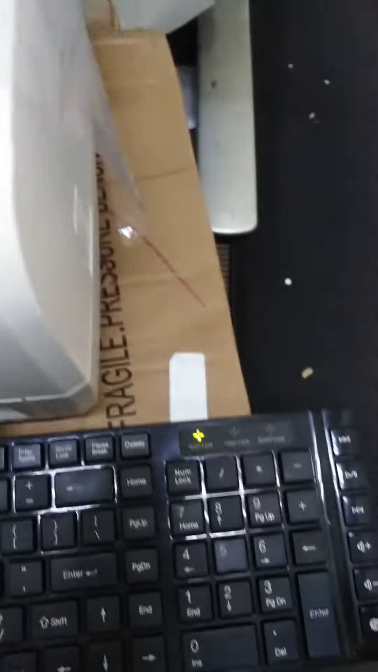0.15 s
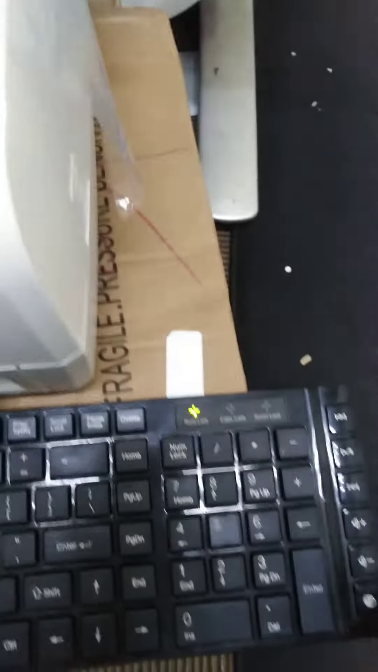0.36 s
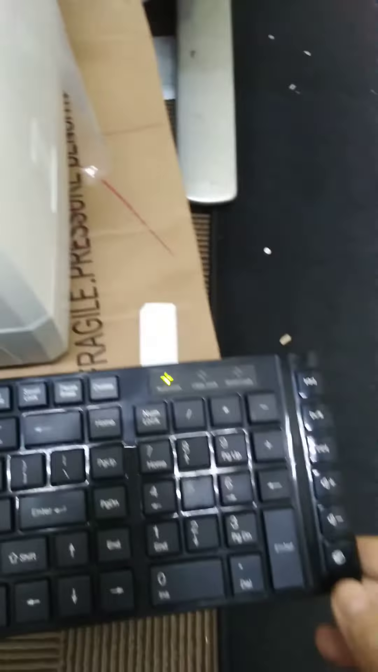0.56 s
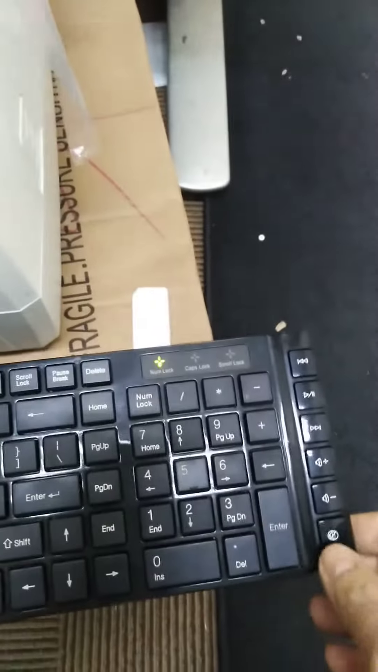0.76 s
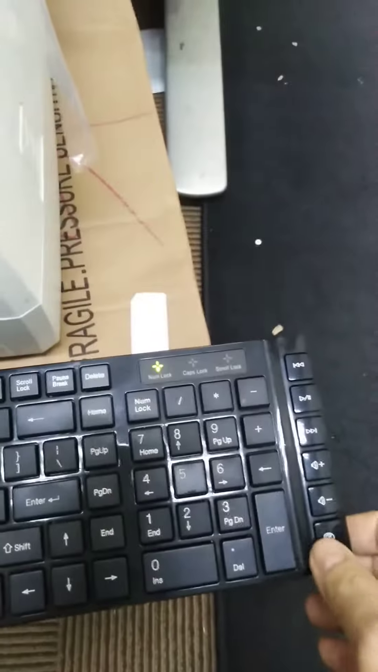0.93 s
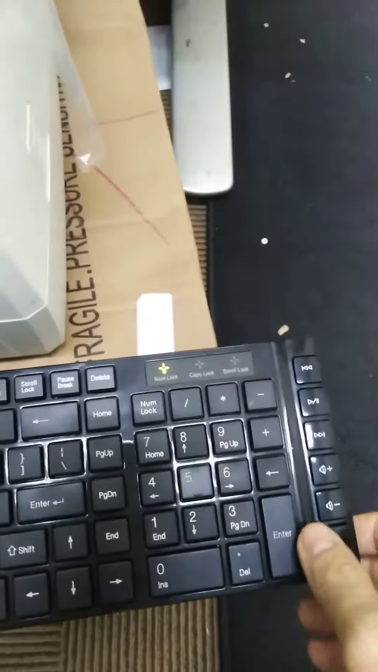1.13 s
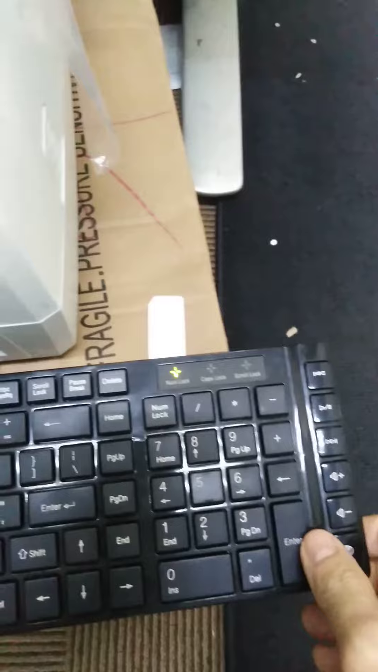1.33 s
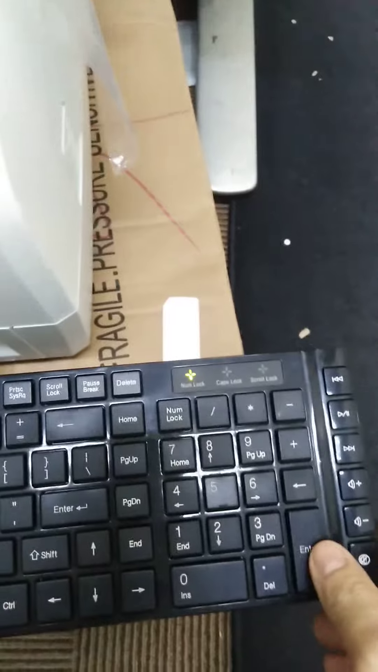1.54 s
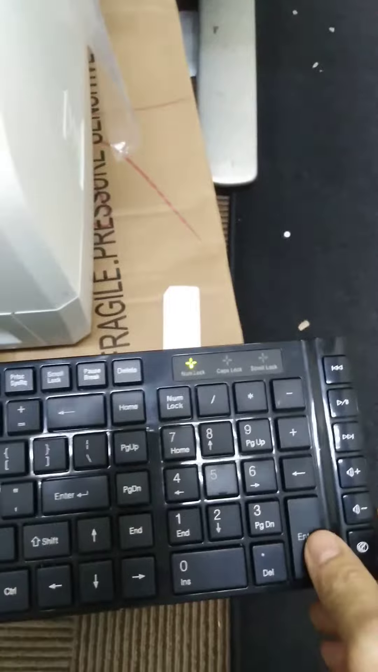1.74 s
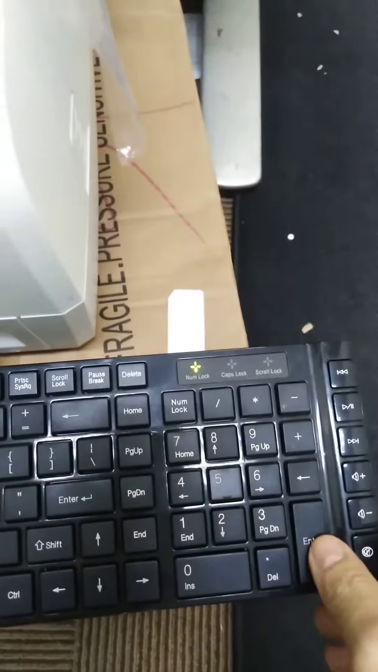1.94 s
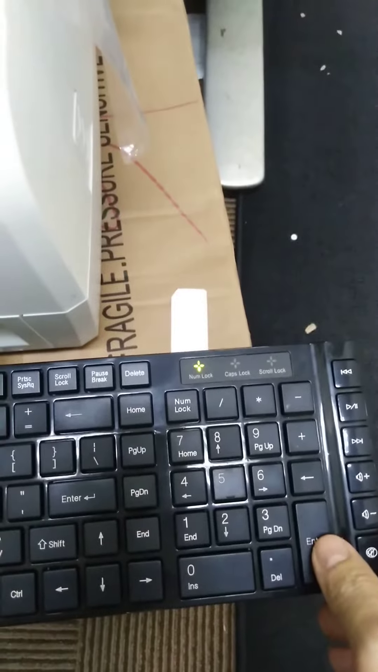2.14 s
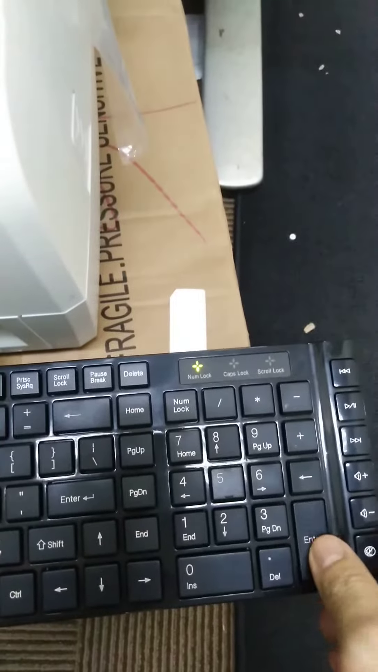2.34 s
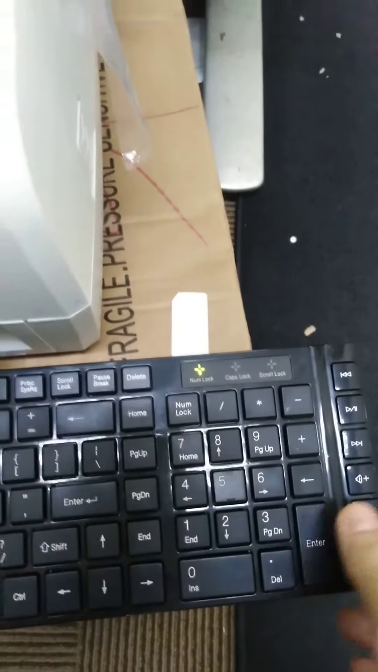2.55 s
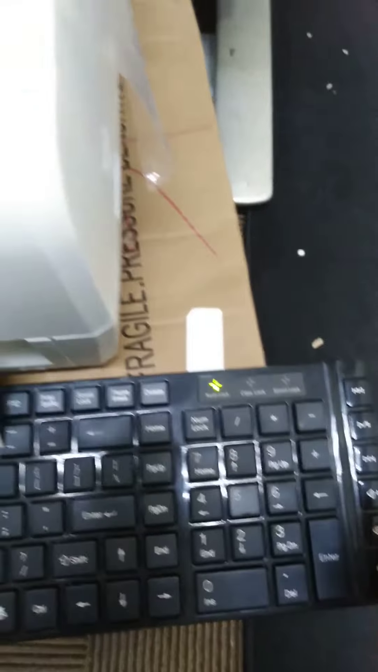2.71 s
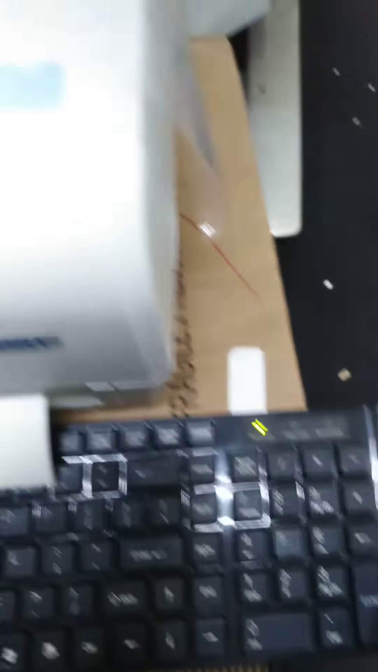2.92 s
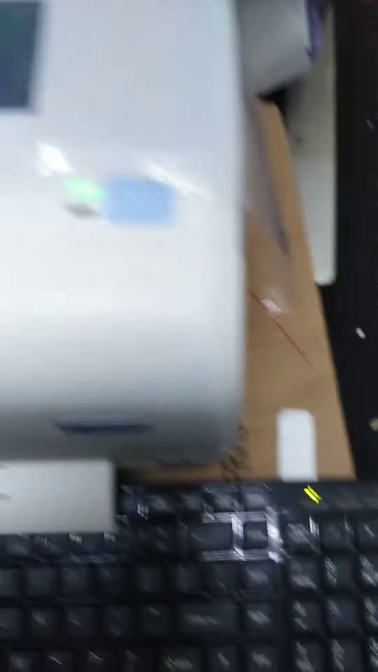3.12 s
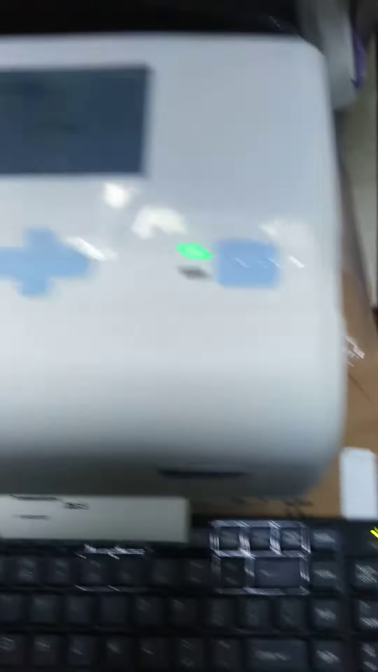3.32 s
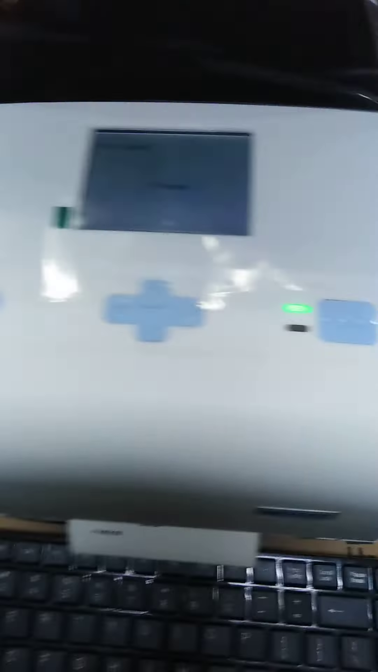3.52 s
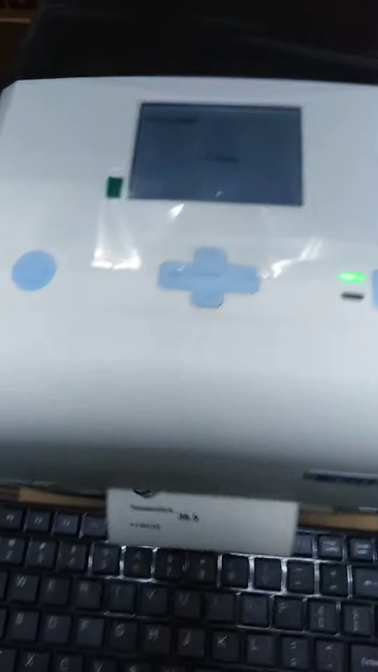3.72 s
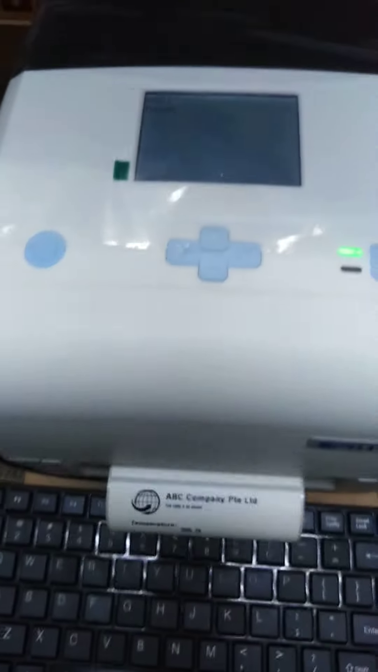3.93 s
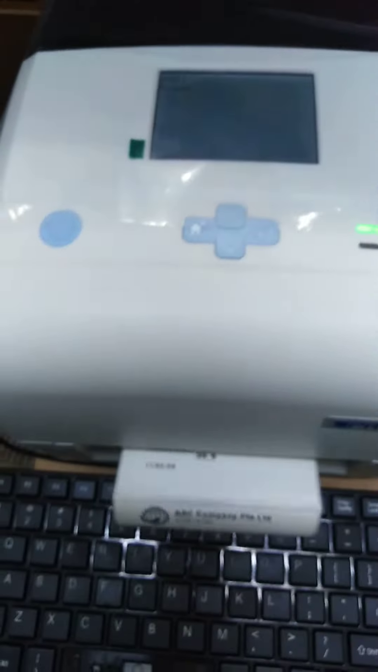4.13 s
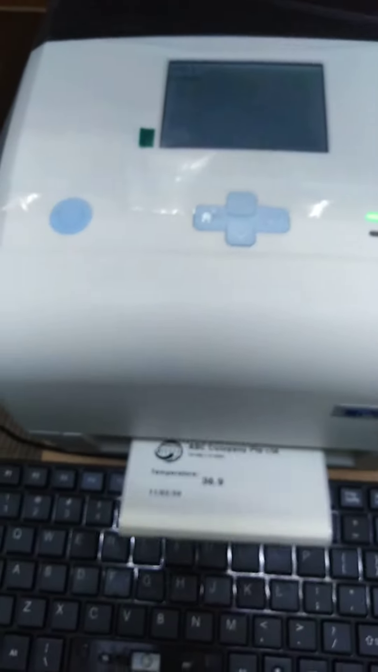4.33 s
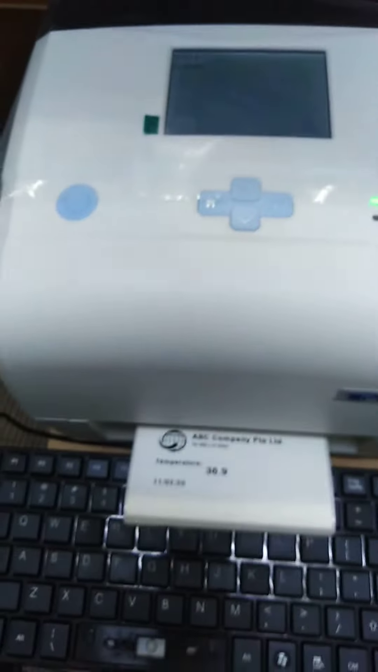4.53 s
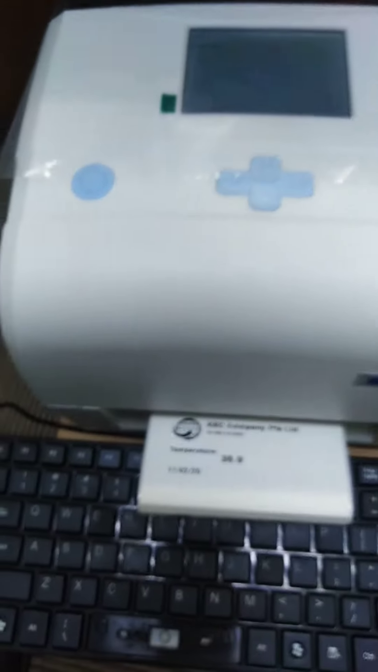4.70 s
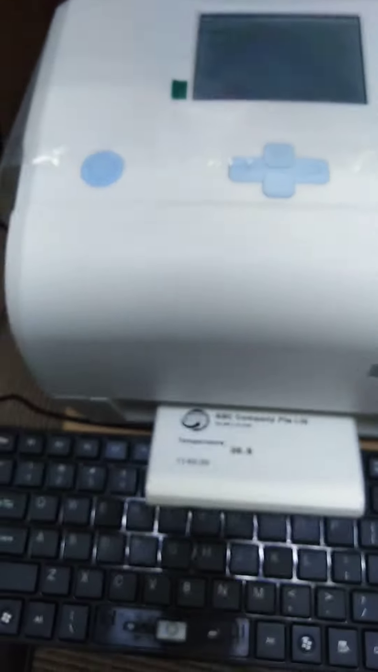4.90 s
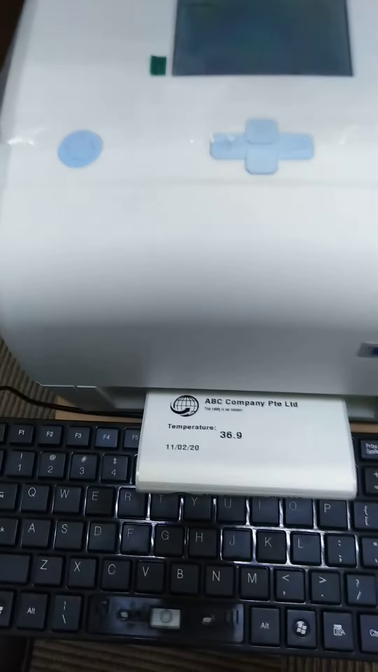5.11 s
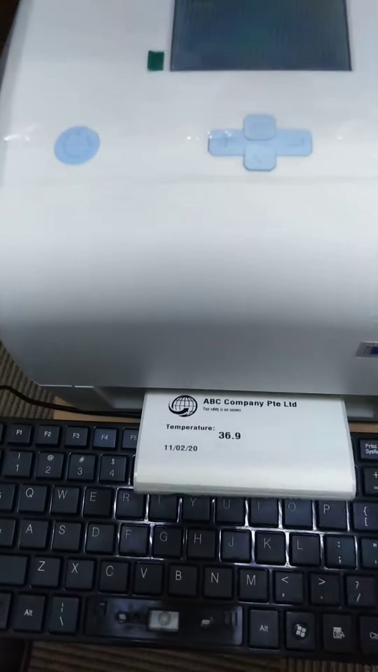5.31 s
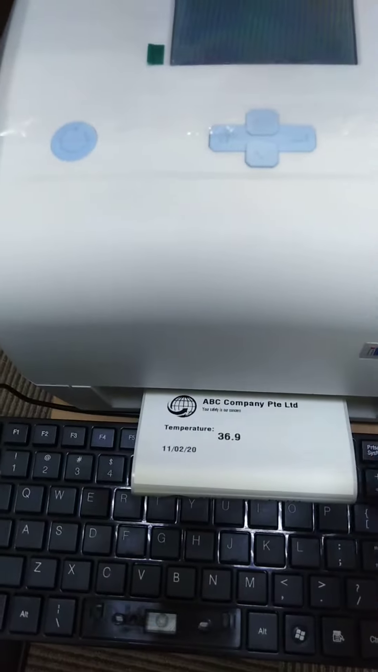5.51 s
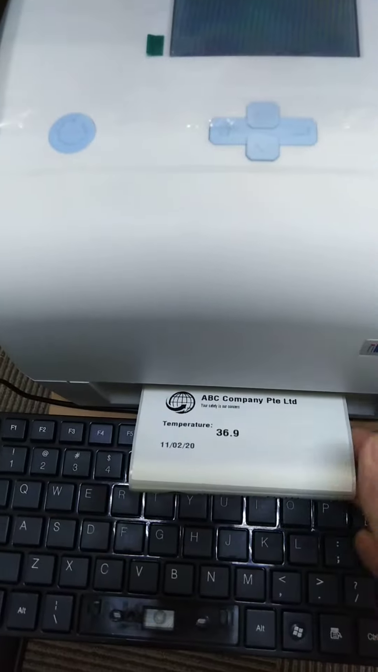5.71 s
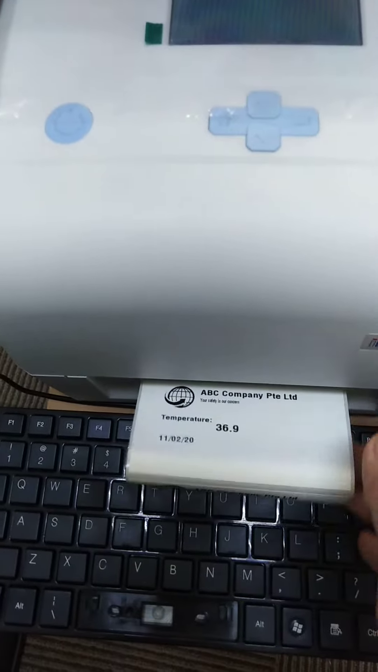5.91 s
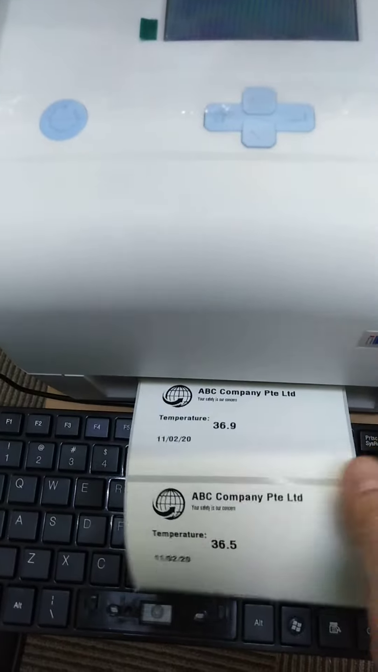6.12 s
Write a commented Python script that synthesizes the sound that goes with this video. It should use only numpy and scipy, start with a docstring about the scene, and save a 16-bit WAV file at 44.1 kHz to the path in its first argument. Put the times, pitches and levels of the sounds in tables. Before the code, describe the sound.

Over a low room hum, light key clicks start a label printer whirring twice, and a label is snapped off up close.

```python
"""Label printer on a desk

A small room, ventilation humming throughout, a stereo microphone by the printer. A key is pressed;
the stepper motor pulls the label back, feeds it out under the print head, brakes and nudges it to
the tear edge, whining through the case while gears rattle and paper hisses. A sleeve swishes, a hand
takes the label and it comes off with a sharp snap, close to the microphone."""
import sys
import numpy as np
from scipy import signal
from scipy.fft import rfft, irfft, next_fast_len
from scipy.io import wavfile
from scipy.ndimage import map_coordinates

SR = 44100
rng = np.random.default_rng(int(sys.argv[2]) if len(sys.argv) > 2 else 0)


def put_to_file(sound):
    """Save the sound as 16-bit audio at rate SR, in the file named by the first command-line argument."""
    columns = np.atleast_2d(sound).T  # one column per channel
    safe = np.clip(columns, -1, 1)
    whole_steps = np.round(safe * 32767)
    wavfile.write(sys.argv[1], SR, whole_steps.astype(np.int16))


N = 271567
TIME = np.arange(N) / SR

# spectra of the air, hands, printer, label and microphone: (frequency [Hz], level [dB])
VENT_COLOUR = [(15, -54), (30, -47), (40, -28.5), (52, -5.5), (86, 0), (119, -8), (148, -5),
               (205, -12.5), (248, -12), (320, -14.5), (600, -18), (760, -27), (1000, -46), (3000, -64)]
RUSH_COLOUR = [(450, -29), (700, -2), (880, -1), (1020, -8.5), (1200, -29.5), (2000, -40.5)]
SLEEVE_COLOUR = [(400, -15), (900, 2.5), (1150, -12), (1700, -11.5), (2900, -1.5), (4200, 0.5), (6200, -1),
                 (8500, -3.5), (14000, -5), (16000, -25)]
BRUSH_COLOUR = [(700, -6), (1250, 3.5), (1600, -5), (2300, 0.5), (3400, -4.5), (6300, 6.5), (9000, 0),
                (12500, -5), (16000, -9.5)]
KEY_COLOUR = [(300, -50), (800, -18), (2200, -17.5), (3800, 0), (6000, -0.5), (8000, 2.5), (11000, -4.5),
              (14000, -13), (16000, -15)]
CHATTER_COLOUR = [(300, -32), (1000, 1), (2000, -4.5), (3000, -1), (4200, -2.5), (5500, -5.5), (7500, -7.5),
                  (10000, -18), (15000, -32)]
GEAR_COLOUR = [(120, -3.5), (220, 13.5), (330, 3.5), (480, 6), (700, -3), (900, 4), (1300, -1.5), (1850, 2),
               (2400, -6), (3000, -0.5), (3700, -14), (5000, -12), (8000, -46)]
PAPER_COLOUR = [(1500, -15.5), (3500, -0.5), (4800, 1.5), (6200, 0.5), (7050, -1), (8000, -9.5),
                (9500, -3.5), (10500, -10.5), (14000, -9.5), (16000, -45)]
TICK_COLOUR = [(300, -40), (800, -5), (3000, -11), (5000, 4), (6500, -1.5), (9000, -8), (12000, -7.5),
               (16000, -15.5)]
DRONE_COLOUR = [(600, -45), (800, -3), (930, 5), (1100, -18), (1400, -24), (3000, -56)]
CASE_RESPONSE = [(150, -23), (200, -4), (236, 6), (275, 4), (340, -7), (520, 6), (700, -1), (880, 1.5),
                 (1050, -1.5), (1300, -1.5), (1600, 0.5), (2000, -1), (2550, -2.5), (2850, 5.5), (3300, 2),
                 (3700, -1), (4300, 1.5), (5200, -4), (6300, -12), (9000, -24)]
PULL_COLOUR = [(200, -41), (600, 0), (1100, 5.5), (1800, 13.5), (2600, 7), (4000, 4.5), (6000, 4),
               (8500, -0.5), (13000, -9), (16000, -14)]
SNAP_COLOUR = [(300, -17), (700, -17.5), (1200, -0.5), (2400, -2), (3800, -5.5), (5000, -3.5), (6100, -1.5),
               (7300, -14.5), (10400, -8.5), (14000, -12), (16000, -5)]
MIC_HISS = [(600, -7), (2300, 12), (3500, 3.5), (6500, -6), (10000, -5.5), (14000, -14), (16000, -30)]
# fan tones: (frequency [Hz], level [dB])
FAN_TONES = [(93, -60), (145, -63), (303, -66.5)]
# course of the lowest fan tone and of the soft rush near the printer: (time [s], gain [dB])
FAN_CURVE = [(0, 11), (2.3, 7), (3.2, 9), (4.5, -23), (6.16, -15)]
RUSH_CURVE = [(0, -88), (2.9, -75), (4.7, -60.5), (5.3, -66.5), (6.16, -59.5)]
# decay of the room: (frequency [Hz], t60 [s])
ROOM_DECAY = [(200, 0.29), (1000, 0.45), (3000, 0.42), (7000, 0.36), (14000, 0.46)]
# likeness of left and right at the microphone: (frequency [Hz], correlation [ratio])
COHERENCE = [(60, 0.95), (200, 0.94), (500, 0.72), (1200, 0.26), (2500, 0.71), (5000, 0.36), (14000, 0.12)]
# lean of the microphone ports and the off-centre label: (frequency [Hz], left over right [dB])
PORT_BALANCE = [(60, 0.6), (200, 1), (380, -2.5), (700, 1.5), (1300, -1.5), (2400, -1.5), (4400, 1.5),
                (6500, 6), (8500, 3.5), (10500, -11), (15000, -7)]
LABEL_BALANCE = [(1000, 1), (2000, 7), (4000, -2.5), (6500, 1), (9000, -3), (14000, -1)]
# whines at rest: (start [s], end [s], frequency [Hz], level [dB])
IDLE_TONES = [(4.62, 5.03, 2390, -85), (4.795, 5.021, 6540, -89)]
# creaks under the hand: (start [s], length [s], frequency [Hz], level [dB])
CREAKS = [(0.303, .06, 1250, -76), (0.418, 0.09, 2200, -76.5), (.66, .06, 1140, -73),
          (0.867, 0.027, 2500, -79), (1.039, .03, 1090, -71), (1.177, .04, 1330, -76),
          (1.885, 0.13, 1290, -73)]
# brushes of fingers and cuff: (start [s], end [s], level [dB])
BRUSHES = [(0, .08, -70.5), (0.082, 1.153, -83.5), (0.594, 0.713, -80.5), (0.99, 1.11, -80.5),
           (1.83, 2.1, -88), (2.7, 2.74, -78.5), (2.861, 3.0, -70.5), (4.796, 5.03, -78),
           (5.354, 5.57, -66), (5.57, 5.68, -78.5)]
# modes that the knocks ring: (frequency [Hz], level [dB], t60 [s])
KEY_MODES = [(1430, -2.5, 0.11), (1860, 0, 0.14), (2440, -11, 0.042), (2880, -0.5, 0.096),
             (3900, -3.5, 0.1)]
CASE_MODES = [(1795, 2, 0.022), (1560, -3, 0.012), (1020, -14, 0.019), (2960, -19, 0.021)]
LABEL_MODES = [(1420, 0, 0.0078), (1766, 9.5, 0.013), (2620, 7, 0.0055), (5830, -2.5, 0.0065)]
# finger on keys: (time [s], crack [dB], knock [dB], brightness [dB/octave], ring pitch [ratio])
KEY_HITS = [(1.101, -64, -46.5, -1.5, 1.3), (1.299, -74, -47.5, -4.5, 1.0), (1.4615, -50, -46, 10, 2.35),
            (2.1445, -37, -46, 8.5, 2.3), (2.331, -43.5, -48, -10.5, 1.4), (2.427, -58, -49, -12, 2.7),
            (2.442, -62, -57, -13, 2.4), (2.452, -32, -35, -5.5, 2.3), (2.46, -27.5, -49, -6, 2.6),
            (2.4645, -25.5, -46, 3, 1.7), (2.4665, -26, -47, -2.5, 1.9)]
# ticks in the printer: (time [s], crack [dB], knock [dB])
TICKS = [(3.111, -45, -23), (3.375, -27.5, -50), (3.459, -43, -39), (3.769, -28, -23.5),
         (3.822, -40, -30.5), (3.873, -28, -38), (3.882, -28, -39), (3.93, -26, -30.5),
         (3.9472, -17.5, -38), (4.024, -20, -44), (4.046, -29, -43), (4.056, -28, -38), (4.196, -28.5, -52),
         (4.211, -20.5, -36), (4.218, -28, -45), (4.2574, -20, -23.5)]
# label against the tear edge: (time [s], crack [dB], knock [dB], brightness [dB/octave])
SNAPS = [(5.7345, -43, -42, -7), (5.738, -45, -25, 3), (5.8, -44, -60, -2), (5.882, -51, -58, -9),
         (6.0076, 2.5, -15, 0), (6.0092, -5, -12, -4), (6.0185, -18, -41, 2)]
# gear teeth clashing: (start [s], length [s], level [dB], ring [Hz])
CHATTER = [(3, 0.0091, -35, 2950), (3.009, 0.011, -34.5, 3980), (3.055, 0.021, -37.5, 1650),
           (3.101, 0.013, -42, 1740), (3.493, 0.02, -37.5, 4050), (3.517, .012, -46.5, 2890),
           (3.575, 0.008, -39, 5270), (3.601, 0.035, -41.5, 2290), (4.384, 0.014, -46.5, 2880),
           (4.459, 0.014, -52, 2750), (4.571, 0.023, -47.5, 4350)]
# efforts of the roller on dense print and the hand on the label: (start [s], peak [s], level [dB])
STRAINS = [(3.85, 3.88, -41.5), (3.88, 3.95, -52), (3.98, 4.112, -37.5), (4.17, 4.204, -44.5),
           (4.24, 4.272, -47.5), (4.3, 4.38, -62)]
RUBS = [(5.7, 5.738, -46.5), (5.72, 5.8, -56), (5.74, 5.885, -62), (5.915, 5.955, -59),
        (5.895, 6.004, -38.5), (5.995, 6.022, -32), (6.03, 6.15, -54)]
# motor runs: (start [s], braking from [s], crawl time [s], cruising rate [steps/s], drive [dB])
RETRACT = (3.002, 3.495, .029, 2343, 0)
FEED = (3.575, 4.381, .023, 4875, 0.38)
# slow pushes to the tear edge: (start [s], end [s], fastest at [s], top rate [steps/s], drive [dB])
NUDGES = [(4.38, 4.44, 4.39, 970, -1), (4.444, 4.477, 4.466, 900, 0), (4.558, 4.587, 4.58, 848, -1)]
# motor tones, cruising and changing speed: (multiple of the step rate [ratio], level [dB])
RETRACT_TONES = [(1 / 8, -50), (1 / 4, -40.5), (3 / 8, -56), (1 / 2, -61), (2 / 3, -61), (5 / 6, -60),
                 (1, -34), (5 / 4, -56), (2, -46.5), (9 / 4, -62), (3, -58), (4, -60)]
FEED_TONES = [(1 / 22, -55.5), (1 / 16, -53), (1 / 8, -56.5), (1 / 4, -46), (1 / 3, -59.5), (2 / 3, -63),
              (15 / 16, -56), (1, -46.5), (5 / 4, -71), (31 / 16, -62)]
RAMP_TONES = [(1 / 4, -38), (1 / 2, -50), (3 / 4, -60), (1, -35), (5 / 4, -58), (3 / 2, -55), (2, -48.5),
              (9 / 4, -58), (3.3, -48.5), (4, -56.5), (5, -56), (6, -57), (6.5, -59)]
# swell of the whine as the label runs out: (time [s], step tone [dB], coil tone [dB])
WHINE_CURVE = [(3.5, -0.5, -1), (3.7, 3, -1.5), (3.81, 3, -0.5), (3.87, 0.5, 3), (4.05, 0.5, 3),
               (4.13, 5.5, 2), (4.23, -1.5, 1.5), (4.31, 3, -0.5), (4.37, -7, 1)]

CRAWL_RATE, SHAKE_RATE, PRINT_RATE = 825, 1250, FEED[3]  # steps/s; the gears resonate at SHAKE_RATE


def amp(db):
    """Decibels to gain."""
    return 10 ** (np.asarray(db) / 20)


def unit(x):
    """Scales to an rms of one."""
    return x / np.sqrt(np.mean(x ** 2) + 1e-20)


def read(points, hz):
    """Reads a table on a log-frequency axis."""
    f, value = np.transpose(points)
    return np.interp(np.log(hz + 1), np.log(f + 1), value)


def level(curve):
    """Gain along a dB curve, silent outside it."""
    return amp(np.interp(TIME, *np.transpose(curve), left=-140, right=-140))


def add(mix, s, sound):
    """Mixes a sound in at time s."""
    part = mix[..., round(s * SR):][..., :sound.shape[-1]]
    part += sound[..., :part.shape[-1]]


def envelope(start, stop, attack_s, release_s):
    """A straight rise from start, a hold until stop, then an exponential release."""
    return np.clip((TIME - start) / attack_s, 0, 1) * np.exp(-np.maximum(TIME - stop, 0) / release_s)


def swells(rows, release_s):
    """Each effort builds ever faster to its peak and lets go."""
    return sum(amp(db) * envelope(start, top, top - start, release_s)
               * np.clip((TIME - start) / (top - start), 0, 1) for start, top, db in rows)


def drift(hz):
    """A random wander of unit size, turning about hz times a second."""
    knots = rng.standard_normal(8192)
    return unit(np.interp(TIME * hz, np.arange(len(knots)), knots))


def noise(points, grain_db=0, direct=1):
    """Coloured stereo noise; grain_db roughens it into tiny impacts, direct=0 makes it diffuse."""
    size = next_fast_len(N)
    grains = amp(grain_db * np.minimum(rng.exponential(1, size // 16 + 1), 5)).repeat(16)[:size]
    a, b = rfft(rng.standard_normal((2, size)) * grains)
    hz = np.fft.rfftfreq(size, 1 / SR)
    same = np.clip(direct * read(COHERENCE, hz), -1, 1)
    mid, side = a * np.sqrt(1 + same), b * np.sqrt(1 - same)
    return unit(irfft(np.array([mid + side, mid - side]) * amp(read(points, hz)), size)[:, :N])


def mottle(x, patch_db, width_hz, length_s, even_below_hz=640):
    """Patches of the middle and treble swell and fade at random."""
    hz, t, z = signal.stft(x, SR, nperseg=512)
    knots = rng.standard_normal((256, 1024))
    grid = np.meshgrid(hz / width_hz, t / length_s, indexing="ij")
    patches = unit(map_coordinates(knots, grid, order=1, mode="wrap"))
    gain = amp(patch_db * np.minimum(hz / even_below_hz, 1)[:, None] * np.minimum(patches, 2))
    gain /= np.sqrt(np.mean(gain ** 2, axis=1, keepdims=True))
    return signal.istft(z * gain, SR, nperseg=512)[1][:, :N]


def lean(x, balance):
    """Leans each band left or right."""
    size = next_fast_len(N + 4096)
    half_db = read(balance, np.fft.rfftfreq(size, 1 / SR)) / 2
    return irfft(rfft(x, size) * amp([half_db, -half_db]), size)[:, :N]


def crack(points, tilt_db):
    """The shortest causal pulse with this spectrum, tilted per octave above 2 kHz."""
    hz = abs(np.fft.fftfreq(2048, 1 / SR))
    log_gain = np.log(amp(read(points, hz) + tilt_db * np.log2(np.maximum(hz, 2000) / 2000)))
    pulse = np.fft.ifft(np.exp(np.conj(signal.hilbert(log_gain)))).real
    return pulse / abs(pulse).max()


def hits(rows, points, modes, scatter, scatter_s, build_s=0.00019, spread=0):
    """Cracks scattered by nearby surfaces, with short rings; spread splits each mode into a cluster."""
    t, out = np.arange(8192) / SR, np.zeros((2, N))
    low_cut = signal.butter(3, 900, "high", fs=SR, output="sos")

    def blow(crack_db, knock_db, tilt_db=0, pitch=1):
        """One blow, with its own brightness and pitch."""
        detuned_t = pitch * (1 + spread * rng.standard_normal(size=(8, 1))) * t
        ring = sum(amp(db + tilt_db * np.log2(hz) - 60 * t / t60)
                   * np.sin(2 * np.pi * hz * detuned_t).mean(0) for hz, db, t60 in modes)
        ring = signal.sosfilt(low_cut, ring)
        ring = ring / abs(ring).max() * (1 - np.exp(-t / build_s))
        paths = scatter * rng.standard_normal((2, len(t))) * np.exp(-t / scatter_s)
        paths[:, 0] = 1  # straight to the microphone
        sharp = signal.fftconvolve(paths, crack(points, tilt_db)[None], axes=1)[:, :len(t)]
        return amp(crack_db) * sharp + amp(knock_db) * ring

    for s, *row in rows:
        add(out, s, blow(*row))
    return out


def ventilation(air_db=-46):
    """Room tone: a low rush of air and wavering fan tones, with a soft rush near the printer."""
    tones = [np.sqrt(2) * amp(db + 1.3 * drift(10)) * np.sin(2 * np.pi * (hz * TIME + 0.1 * drift(7.1)))
             for hz, db in FAN_TONES]
    fan = tones[0] * level(FAN_CURVE) + sum(tones[1:])
    return amp(air_db) * noise(VENT_COLOUR) + level(RUSH_CURVE) * noise(RUSH_COLOUR, grain_db=1.5) + fan


def room(x, early=0.24, early_s=0.03):
    """Dense early echoes off the desk, then a tail that dies band by band."""
    taps = rng.choice([-1., 1.], (2, SR // 2)) * (rng.random((2, SR // 2)) < .12)
    taps[:, :60] = 0  # gap before the first echo
    hz, t, z = signal.stft(taps, SR, nperseg=256)
    z = z * amp(-60 * t / read(ROOM_DECAY, hz)[:, None]) * (1 + early * np.exp(-t / early_s))
    tail = signal.istft(z, SR, nperseg=256)[1]
    return signal.fftconvolve(x, tail / np.linalg.norm(tail[0]), axes=1)[:, :N]


def idle(waver_db=5.5):
    """Thin, unsteady whines of the printer at rest."""
    return np.sqrt(2) * sum(amp(db + waver_db * drift(25)) * envelope(start, stop, 0.024, 0.049)
                            * np.sin(2 * np.pi * (hz * TIME + 0.15 * drift(90)))
                            for start, stop, hz, db in IDLE_TONES)


def creaks(q=9):
    """Skin drags on plastic and briefly excites one narrow resonance."""
    friction, out = noise(BRUSH_COLOUR, grain_db=3.0, direct=0), np.zeros((2, N))
    for s, length, hz, db in CREAKS:
        part = slice(round(s * SR), round(s * SR) + SR // 3)
        band = signal.butter(2, [hz - hz / q / 2, hz + hz / q / 2], "band", fs=SR, output="sos")
        ring = unit(signal.sosfilt(band, friction[:, part]))
        add(out, s, amp(db) * ring * envelope(s, s + length, 0.013, .015)[part])
    return out


def handling(left_db=3.0, catch_db=2.0):
    """Left of the microphone a sleeve swishes as the arm reaches out; fingers and cuff brush things."""
    reach = amp(-54) * envelope(5.045, 5.24, 0.084, 0.078)
    swish = reach * noise(SLEEVE_COLOUR, grain_db=0.5, direct=0)
    touch = sum(amp(db) * envelope(start, stop, 0.025, 0.056) for start, stop, db in BRUSHES)
    touch *= amp(catch_db * drift(35))
    friction = noise(BRUSH_COLOUR, grain_db=2.0, direct=0)
    brush = touch * mottle(friction, patch_db=8, width_hz=260, length_s=.07)
    return (swish + brush) * amp([[left_db], [-left_db]])


def keyboard():
    """A finger clicks on the keys and the keyboard rings."""
    return amp(-1.5) * hits(KEY_HITS, KEY_COLOUR, KEY_MODES, scatter=0.42, scatter_s=0.0019,
                            build_s=0.0011, spread=0.0178)


def chatter(ring_db=5, ring_q=6.5):
    """Teeth clash as they take up slack, each burst ringing a different part of the gear train."""
    teeth, out = noise(CHATTER_COLOUR, grain_db=1.0), np.zeros((2, N))
    for s, length, db, ring_hz in CHATTER:
        burst = (teeth * envelope(s, s + length, 0.0035, 0.0049))[:, round(s * SR):][:, :SR // 10]
        ring = signal.lfilter(*signal.iirpeak(ring_hz, ring_q, SR), burst)
        add(out, s, amp(db - 0.5) * (burst + amp(ring_db) * ring))
    return out


def transport(moves, gears_db=-44, shake_db=12, shake_octaves=0.5, paper_db=-50, stir_s=0.0084):
    """Gears rattle and label stock hisses over the roller as the motor turns; each tick stirs both."""
    stir = amp(-27.5) * sum(amp(db) * np.exp(-abs(TIME - s) / stir_s) for s, db, _ in TICKS)
    rattle, slide = stir, amp(-6) * stir
    for rate, drive in moves:
        speed_db = np.log2(rate / PRINT_RATE)  # slow gears are quieter, 1 dB per octave
        resonance = np.exp(-(np.log2(rate / SHAKE_RATE) / shake_octaves) ** 2)
        rattle = rattle + drive * amp(gears_db + speed_db + shake_db * resonance)
        slide = slide + drive * amp(paper_db)
    rattle *= amp(1.5 * drift(28))
    gears = rattle * mottle(noise(GEAR_COLOUR, grain_db=4.0), patch_db=2.8, width_hz=221, length_s=.035)
    hiss = slide * mottle(noise(PAPER_COLOUR, grain_db=1.0), patch_db=4.5, width_hz=348, length_s=.09)
    flicker = amp(0.93 * drift(110))
    return (gears + hiss) * flicker + chatter()


def drone(drone_hz=824, ring_hz=832, ring_t60_s=0.31):
    """The case hums roughly near its main resonance under load, and rings on after the last nudge."""
    tone = np.sqrt(2) * np.sin(2 * np.pi * (drone_hz * TIME + 0.078 * drift(44)))
    hum = amp(-2) * tone + amp(-4) * noise(DRONE_COLOUR, grain_db=5.0)
    start, stop = NUDGES[-1][:2]
    ringing = amp(-43) * envelope(start, stop, stop - start, ring_t60_s / np.log(1000))
    return ringing * np.sin(2 * np.pi * ring_hz * TIME) + swells(STRAINS, release_s=0.013) * hum


def boom(x, hz=231.8, width_hz=12.4):
    """The lowest resonance of the case builds up and dies a little behind the motor."""
    return amp(0.5) * signal.lfilter(*signal.iirpeak(hz, hz / width_hz, SR), x)


def nudge(start, stop, fastest, top_rate, db, swell_s=.019):
    """Step rate and drive of one slow push, rising a little above a crawl."""
    rate = CRAWL_RATE + (top_rate - CRAWL_RATE) * np.exp(-((TIME - fastest) / swell_s) ** 2)
    return rate, amp(db) * envelope(start, stop, 0.01, 0.0094)


def run(start, stop, crawl_s, top_rate, db, speed_up=.0101, brake=0.041, ease_s=0.01089):
    """Step rate and drive of one run: the step period shrinks from a crawl, holds and grows to brake."""
    rising_s = ease_s * np.logaddexp(0, (TIME - start - crawl_s) / ease_s)
    period = np.maximum(1 / CRAWL_RATE - speed_up * rising_s, 1 / top_rate)
    period = np.minimum(period + brake * np.maximum(TIME - stop, 0), 1 / CRAWL_RATE)
    return 1 / period, amp(db) * envelope(start, stop, 0.032, 0.0094)


def stepper(rate, drive, tones, jitter=0.0118, smear=.04, rough_db=3.0, ramp_db=-1.5, bright_db=1.9):
    """The motor sweeps roughly through the case resonances; given tones, it cruises on a clean whine."""
    cruise = np.clip((rate / rate.max() - .9) * 20, 0, 1) * bool(tones)
    steps = np.cumsum(rate * (1 + jitter * (1 - cruise) * drift(500))) / SR
    on = drive > .001
    rate, cruise, steps = rate[on], cruise[on], steps[on]
    s, step_db, coil_db = np.transpose(WHINE_CURVE)
    # four steps make one coil cycle
    swell = {1: np.interp(TIME[on], s, step_db), 1 / 4: np.interp(TIME[on], s, coil_db)}
    partials = [(k, cruise * amp(db + swell.get(k, 0))) for k, db in tones]
    octaves = np.log2(rate / CRAWL_RATE)
    torque_db = ramp_db - 3.5 * octaves  # faster steps shake the case less
    for k, db in RAMP_TONES:
        tilt_db = bright_db * np.log2(k) - 0.5 * octaves * (k > 1)  # overtones fade with speed
        partials.append((k, (1 - cruise) * amp(db + torque_db + tilt_db + read(CASE_RESPONSE, k * rate))))
    shake_db = 0.83 + rough_db * (1 - cruise)  # the rotor hunts while its speed changes
    at_ports = np.array([steps, steps - rate * .00005])  # the right port hears it 50 microseconds later
    out = np.zeros((2, N))
    for k, gain in partials:
        load = amp(1.07 * drift(15)[on] + shake_db * drift(150)[on])
        phase = k * at_ports + rng.random()
        phase += smear * k * (1 - cruise) * drift(700)[on]  # uneven steps roughen the upper tones
        out[:, on] += np.sqrt(2) * gain * load * np.sin(2 * np.pi * phase)
    return out * drive


def label():
    """Close to the microphone the label rustles as it is pulled taut, snaps free and flutters."""
    rustle = mottle(noise(PULL_COLOUR, grain_db=1.0), patch_db=2, width_hz=403, length_s=.03)
    snaps = hits(SNAPS, SNAP_COLOUR, LABEL_MODES, scatter=0.7, scatter_s=0.00034)
    return swells(RUBS, release_s=0.014) * rustle + lean(snaps, LABEL_BALANCE)


def scene():
    """Key, printer and label on the desk, in the humming room."""
    back, feed, nudges = run(*RETRACT), run(*FEED), [nudge(*row) for row in NUDGES]
    retract = stepper(*back, RETRACT_TONES)
    forward = stepper(*feed, FEED_TONES)
    for move in nudges:
        forward += stepper(*move, [], jitter=0.00798, smear=0.015,
                           rough_db=1.2, ramp_db=-3.0, bright_db=0.34)
    motor = forward + boom(forward + retract) + drone()
    gentle = [(rate, amp(-1.5) * drive) for rate, drive in nudges]  # slow pushes rattle less
    works = transport([back, feed] + gentle)
    works += hits(TICKS, TICK_COLOUR, CASE_MODES, scatter=0.27, scatter_s=0.0015)
    keys, tear = keyboard(), label()
    echoes = room(amp(-26) * retract + amp(-13) * motor + amp(-6.5) * works
                  + amp(-9.5) * keys + amp(-18.5) * tear)
    direct = retract + motor + works + keys + tear
    return direct + echoes + handling() + creaks() + idle() + ventilation()


def record(dry, hiss_db=-86, edge_hz=14600):
    """Two microphone ports, each with its own colour, and faint hiss; then overload and a band limit."""
    hiss = amp(hiss_db) * mottle(noise(MIC_HISS, direct=0), patch_db=5.0, width_hz=230, length_s=.08)
    heard = np.clip(lean(dry, PORT_BALANCE) + hiss, -.88, .88)
    low_pass = signal.firwin(301, edge_hz, window=("kaiser", 8), fs=SR)
    return signal.oaconvolve(heard, low_pass[None], "same")


dry = scene()
out = record(dry)
put_to_file(out)
```